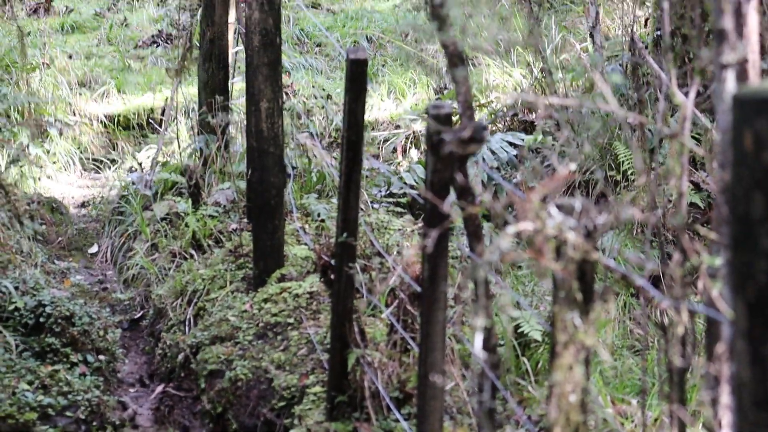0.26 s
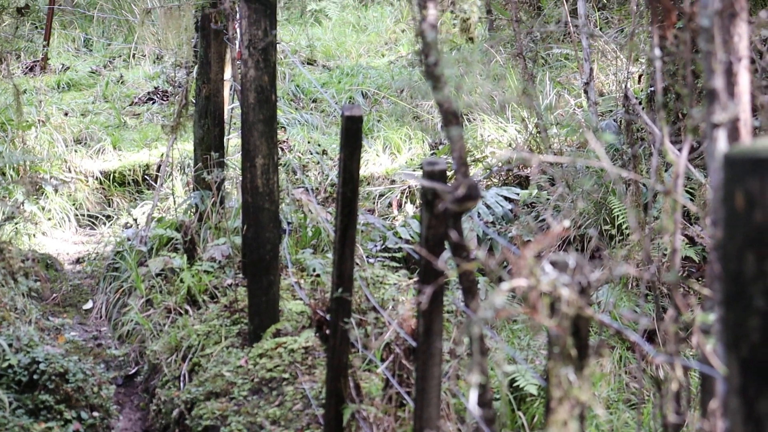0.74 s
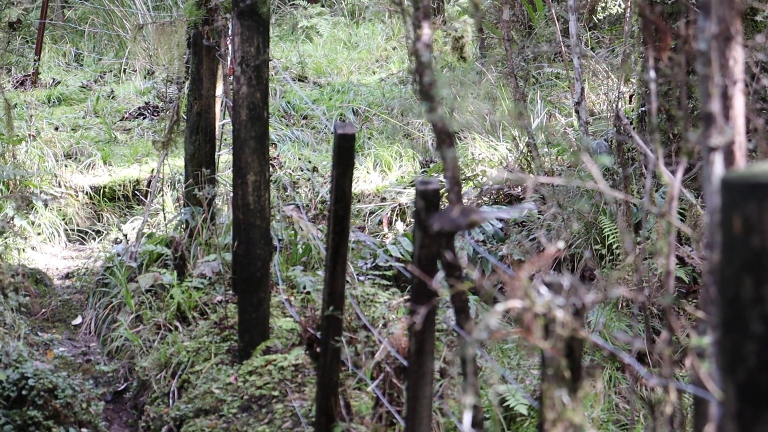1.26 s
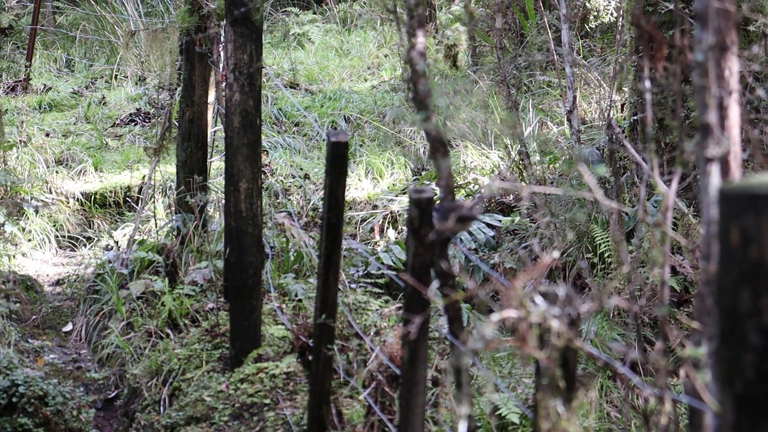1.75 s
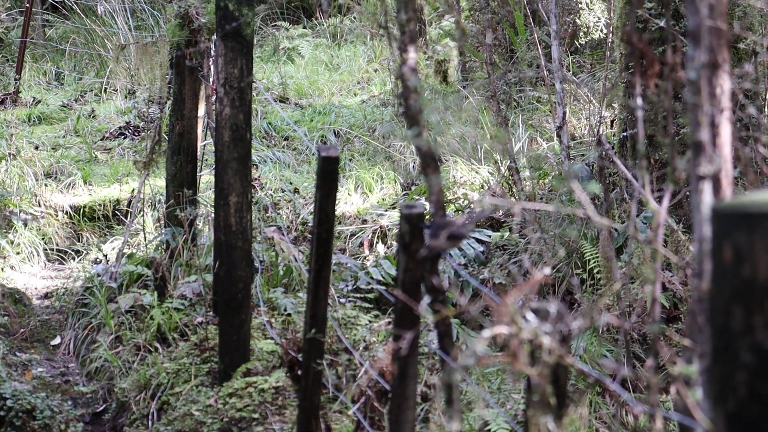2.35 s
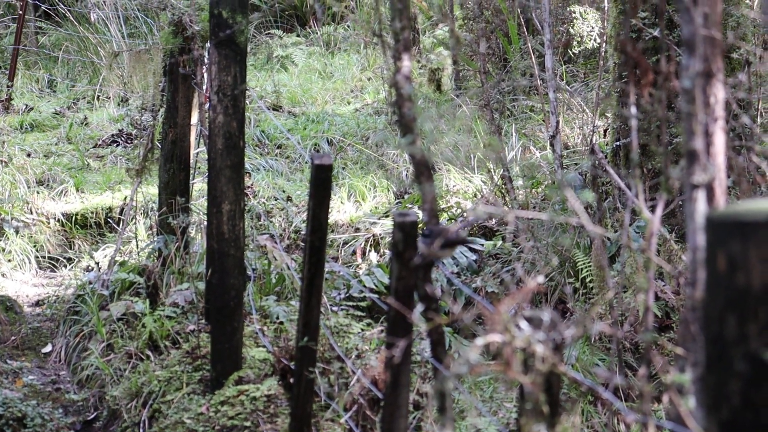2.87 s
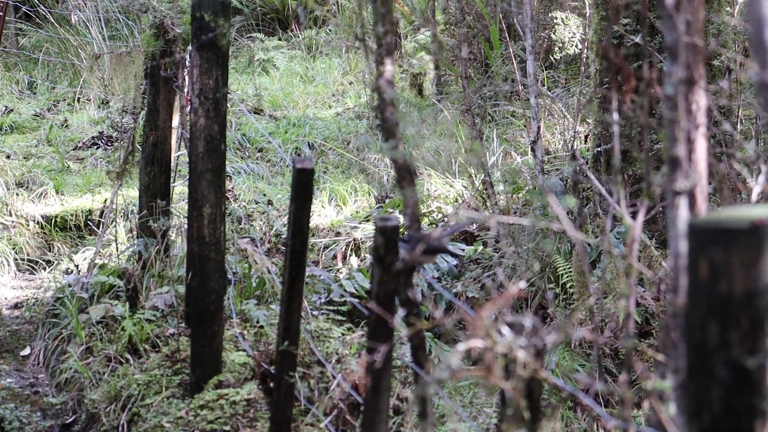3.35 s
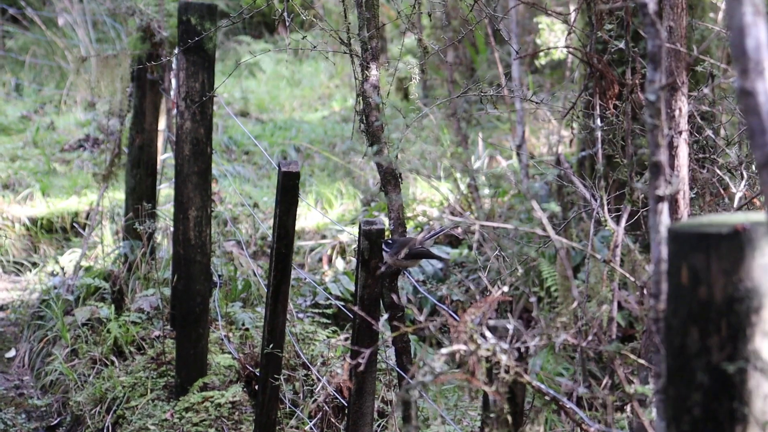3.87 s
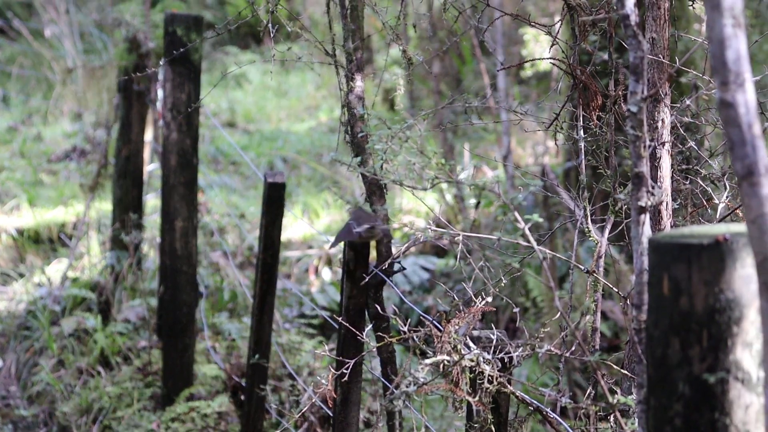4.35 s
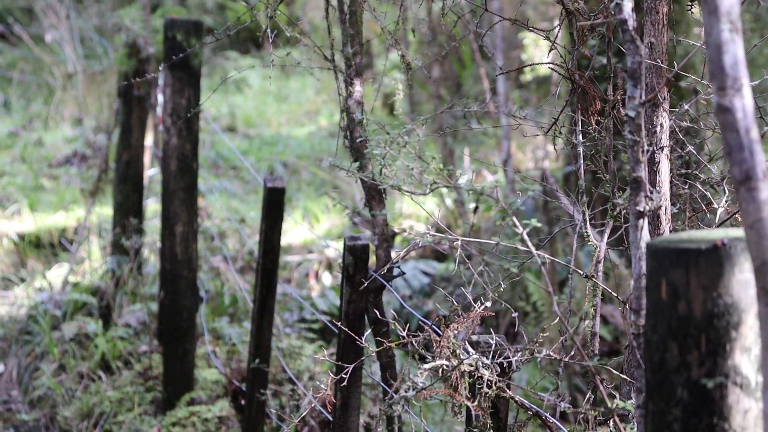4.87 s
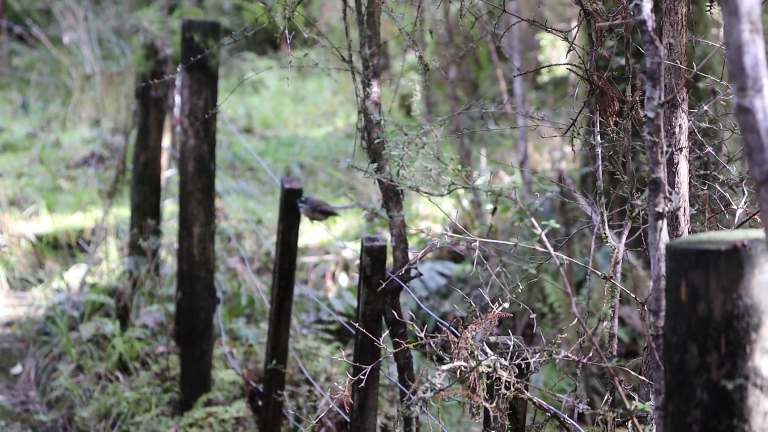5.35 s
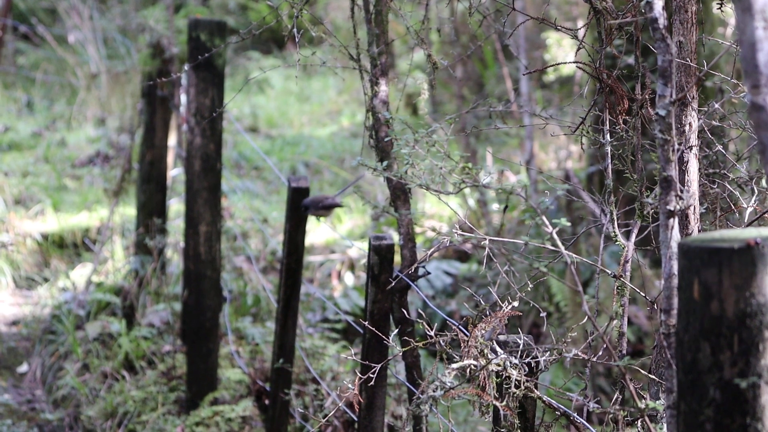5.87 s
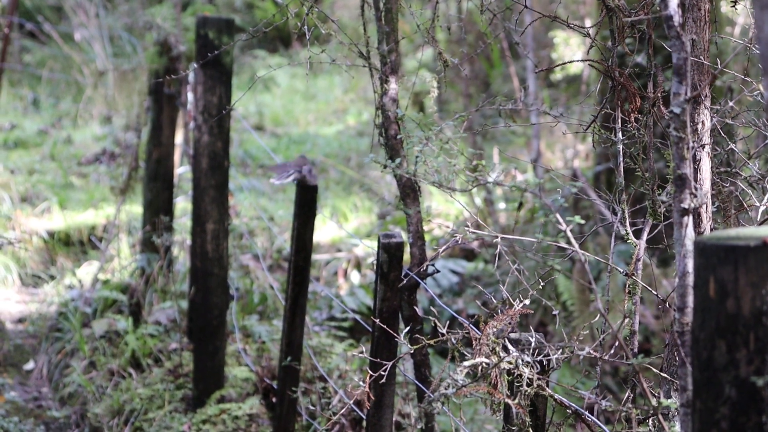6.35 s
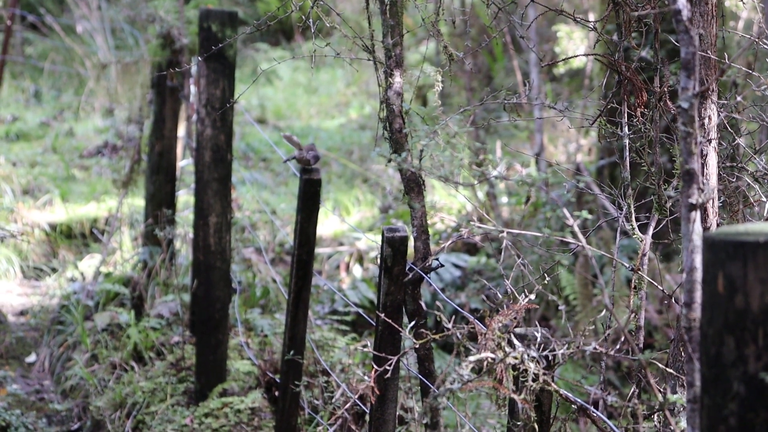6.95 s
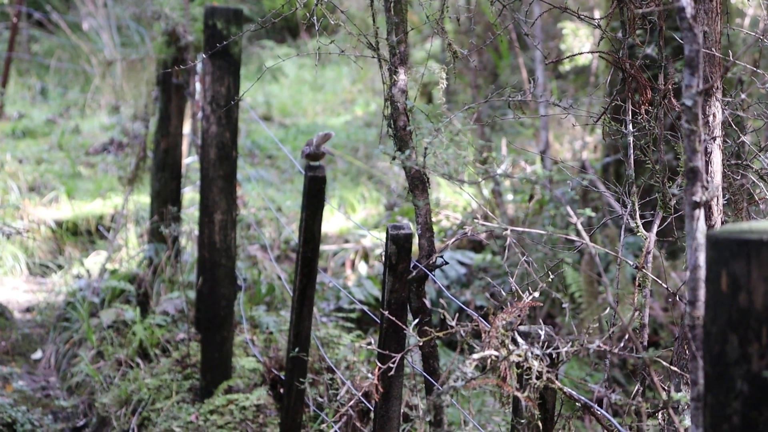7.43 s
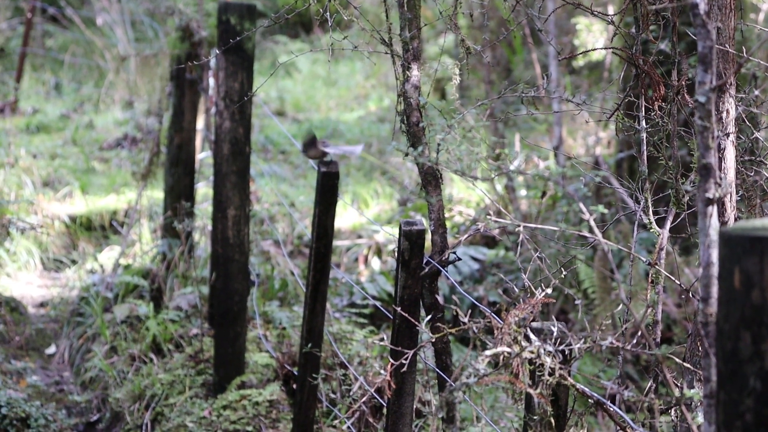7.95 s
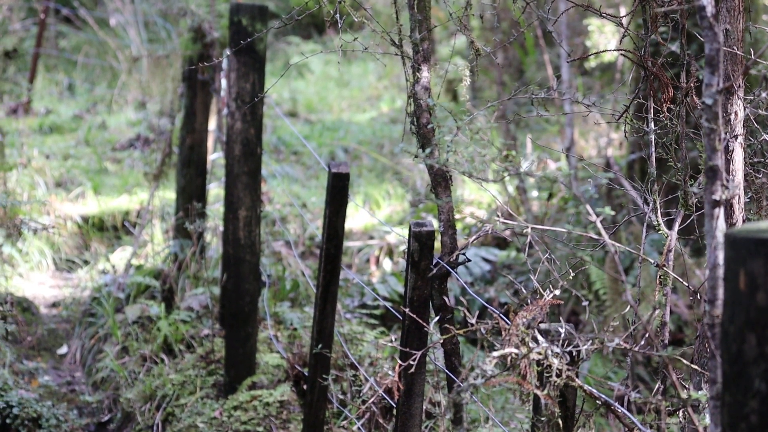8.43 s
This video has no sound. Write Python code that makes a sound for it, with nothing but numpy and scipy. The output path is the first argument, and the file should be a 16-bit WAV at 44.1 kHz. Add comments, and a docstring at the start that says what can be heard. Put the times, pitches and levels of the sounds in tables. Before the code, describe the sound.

Birdsong in a quiet forest: dry clucks, clear ringing notes, sliding whistles, squeals and nasal calls, each with a short echo.

```python
"""A faint, steady rush of forest air and leaves comes first. A bellbird clucks softly, then sings pure
bell notes, sliding whistles, squeals and coughs, with twitter, rasps and bill snaps in between. Its
voice box makes the tones; puffs of air in its throat make the clucks and coughs. The song comes from the
left, and three nasal calls, rich in overtones, come from nearer the middle. Trunks and leaves scatter
every note into a short echo."""
import sys
import numpy as np
from scipy import signal
from scipy.fft import rfft, irfft, next_fast_len
from scipy.io import wavfile
from scipy.ndimage import map_coordinates

SR = 44100
rng = np.random.default_rng(int(sys.argv[2]) if len(sys.argv) > 2 else 0)


def master_out(mix):
    """Clip the mix to full scale and print it as 16-bit PCM to the path in sys.argv[1]."""
    frames = np.transpose(np.atleast_2d(mix))
    ceiling = np.clip(frames, -1, 1)
    pcm = np.round(ceiling * 32767).astype(np.int16)
    wavfile.write(sys.argv[1], SR, pcm)


N = 383669

# The tone of the forest rush. Each row: frequency in Hz, relative level in dB.
FOREST_COLOUR = [(15, -50), (25, -21), (64, -8.5), (110, -7), (333, -3), (413, -10), (460, -8.5),
                 (670, -8.5), (1550, -11.5), (2190, -12), (2380, -12.5), (4190, -14.5), (4800, -16.5),
                 (8220, -20.5), (15700, -25)]
# How alike the rush is left and right. Each row: frequency in Hz, likeness from 0 to 1.
FOREST_LIKENESS = [(40, 0.6), (120, 0.39), (400, 0.6763), (1000, 0.15), (3000, 0.086), (12000, 0.036)]
# The echo from the leaves. Each row: frequency in Hz, seconds it takes to fade by 60 dB.
LEAF_FADE = [(300, 0.8), (1000, 0.60615), (2500, 0.51962), (6000, 0.38924), (14000, 0.23263)]
# Echoes from ground, posts and trunks. Each row: delay in seconds, relative level in dB,
# seconds by which the left side hears it first.
TRUNK_ECHOES = [ (.0043, -11.5, .00012), (.0078, -9.5, .00002), (0.0142, -12, .00015),
                (.0177, -18.5, -.00008), (0.022, -11, .00010), (0.0256, -11, .00014),
                (0.0332, -17, -.00003), (0.0389, -18.5, .00012), (.0462, -20.5, .00005),
                (.0555, -21.5, -.00011), (.0668, -22, .00013)]
# Bouts of twitter. Each row: start in seconds, length in seconds, level in dB.
TWITTER_BOUTS = [(0.046, 0.02228, -54.5), (1.62, 0.055, -66), (2.537, 0.23, -51.5), (4.368, 0.0619, -52),
                 (4.775, 0.06657, -58.5), (5.115, 0.0628, -57), (5.541, 0.11815, -47),
                 (7.811, 0.04354, -51.5), (8.296, 0.0479, -50), (8.42, 0.067, -51.5)]
# Nasal calls. Each row: start in seconds, length in seconds, pitch in Hz, level in dB,
# time of the upward flick in seconds, its height as a share of the pitch.
NASAL_NOTES = [(5.447, 0.12862, 1300, -36, 5.512, .11), (5.745, 0.12995, 1252, -35.5, 5.857, 0.062),
               (6.228, .128, 1242, -37.5, 6.340, 0.016)]
# How the beak shapes a nasal call. Each row: frequency in Hz, relative level in dB.
BEAK_COLOUR = [(1200, -20), (2500, -15.5), (3800, -6), (5100, 3.5), (6300, 3.5), (7600, -6), (9000, -13.5),
               (11500, -16), (15500, -29)]
# Clucks. Each row: start in seconds, relative level in dB.
CLUCK_PUFFS = [(0.908, -38.5), (1.072, -44.5), (1.159, -37.5), (1.179, -42), (1.255, -39), (1.361, -36.5),
               (1.465, -37), (1.559, -38.5), (1.655, -39), (1.789, -47), (1.881, -40.5)]
# How the throat shapes a cluck. Each row: frequency in Hz, relative level in dB.
THROAT_COLOUR = [(150, -21), (550, -14), (800, 0.5), (960, -9), (1200, -11.5), (1650, -12), (2600, -20),
                 (6000, -25.5), (15000, -27.5)]
# Rasps, clicks and bill snaps. Each row: start in seconds, length in seconds,
# ringing frequency in Hz, level in dB.
RASPS_AND_SNAPS = [ (2.541, .086, 11800, -55.5), (2.808, 0.04343, 3930, -46), (3.592, 0.01098, 1260, -50),
                   (3.80, 0.09209, 740.2, -47), (4.068, .019, 1253, -49), (4.103, 0.014106, 1284, -45),
                   (4.140, 0.01921, 1294, -46.5), (4.257, 0.04253, 1165, -53),
                   (5.228, 0.005206, 3200, -50.5), (6.530, 0.005467, 1416, -41),
                   (6.553, 0.008122, 2300, -39), (7.645, 0.007798, 1762, -41.5), (7.657, .045, 1761, -51.5),
                   (7.9612, 0.003, 2101, -37)]
# Coughs. Each row: start in seconds, length in seconds, relative level in dB.
COUGH_NOTES = [(3.776, 0.12382, -44.5), (6.526, .044, -42.5)]
# Where the gullet rings in a cough. Each row: frequency in Hz, width in Hz, gain in dB.
GULLET_RINGS = [(2712.9, 1100, -5.5), (4607.7, 1259, -1), (9510, 15000, -13)]
# Two-voice chirps. Each row: start in seconds, level of the rising voice in dB.
CHIRP_NOTES = [(.725, -50), (5.09, -50.5), (5.585, -52)]
# Squeals. Each row: start in seconds, length in seconds, first pitch in Hz, held pitch in Hz,
# level in dB.
SQUEAL_NOTES = [(4.206, 0.10933, 6320, 5957, -39), (8.113, 0.05451, 7686, 5570, -38)]
# Sliding whistles. Each row: start in seconds, length in seconds, first pitch in Hz, last pitch in Hz,
# level in dB, fade-in in seconds.
SLIDE_NOTES = [ (0.655, 0.016, 2156, 2105, -55.5, 0.029), (1.065, .032, 8991, 7614, -59.5, .006),
               (1.487, 0.024, 2022, 2214, -59, 0.013), (1.953, 0.04148, 2301, 1881, -66.5, 0.01076),
               (2.089, 0.05164, 2391, 1882, -46.5, 0.02288), (2.211, 0.05146, 2606, 1841, -35, 0.02542),
               (2.267, 0.04725, 2550, 1897, -33, 0.01515), (2.474, 0.02424, 1021, 1575, -55, 0.00581),
               (2.637, 0.02986, 2294, 2760, -38, 0.00935), (2.795, 0.04753, 2612, 1545, -22.5, 0.00847),
               (2.841, 0.0545, 1254, 1156, -41.5, 0.004337), (2.959, 0.02971, 2711, 2697, -42.5, 0.012),
               (3.522, .075, 2779, 1598, -57, 0.0057), (3.782, 0.0298, 968.8, 745.6, -46, 0.003482),
               (3.997, 0.16684, 3509, 3860, -50, 0.01694), (4.418, 0.06207, 3452, 1728, -41.5, 0.03055),
               (4.517, 0.03242, 2700, 2031, -46, 0.003333), (4.691, 0.02533, 2222, 1721, -49.5, 0.02865),
               (5.76, 0.05304, 2446, 1896, -40.5, 0.027), (5.828, 0.0338, 2478, 1977, -43, 0.00436),
               (6.001, .036, 2499, 1760, -44, 0.02366), (6.025, 0.02914, 2533, 1770, -40, 0.0056),
               (6.563, 0.06335, 796.5, 672.9, -54, 0.01297), (6.743, 0.037757, 2599, 1690, -32.5, 0.00825),
               (6.957, .12, 4867, 2216, -60, .014), (7.504, .08, 3297, 4354, -54, 0.0097),
               (7.525, 0.10955, 1893, 2740, -59.5, 0.0422), (7.78, 0.02212, 5293, 3553, -51, 0.004434),
               (7.9637, .040, 2062, 1687, -29, 0.001036), (8.044, 0.01976, 2526, 2359, -48, 0.01033),
               (8.162, 0.02242, 3846, 2932, -44.5, 0.002888), (8.299, 0.045418, 2274, 1932, -57.5, 0.01283),
               (8.369, 0.0457, 3265, 2190, -62, 0.00827)]
# Bell notes. Each row: start in seconds, length in seconds, first pitch in Hz, held pitch in Hz,
# level halfway in dB, swell over the note in dB, reediness from 0 to 1.
BELL_NOTES = [ (2.315, 0.06278, 992.7, 1055, -44, 2.5, 0.04), (2.443, 0.03628, 2053, 2176, -37, 9.5, 0),
              (2.457, 0.04538, 1985, 1945, -27.5, 16, 0), (2.531, 0.027334, 1865, 1901, -19.5, -3, 0),
              (2.562, .032, 1933, 1964, -17, -1, 0), (2.592, 0.04, 1935, 1981, -28, 4, 0.01),
              (2.649, .100, 2847, 2884, -27.5, -24, 0), (2.685, 0.04001, 1476, 1353, -33.5, 10.5, 0.01),
              (2.976, .158, 3250, 3003, -17, 2.5, 0), (3.208, 0.15908, 2154, 2079, -22, -3.5, 0),
              (5.883, 0.03499, 987.2, 1025, -43, 8, 0.04), (6.073, 0.13115, 993.8, 1041, -41, -3.5, 0.01),
              (6.348, 0.07885, 2466, 2448, -37, -19, 0), (7.121, 0.10383, 2801, 2670, -41.5, -21, 0),
              (7.278, 0.23678, 1489, 1545, -49.5, -1.5, 0.27), (7.859, 0.06249, 867, 901, -52.5, -3, 0.6),
              (8.546, 0.15244, 851.8, 847.3, -44.5, -5, 0)]
# Overtones of a bell note. Each row: frequency in Hz, level in dB compared with the note.
BELL_OVERTONES = [(2000, -37), (4200, -37.5), (6100, -46.5), (8500, -60), (10500, -42), (12500, -37.5),
                  (15200, -53)]

AIR_HZ, AIR_WIDTH_HZ, AIR_DB = 11700, 15000, -51  # breath hiss, far below its whistle or bell note


def amp(db):
    """Turn decibels into a gain."""
    return 10 ** (np.asarray(db) / 20)


def unit(x):
    """Scale a sound to an average (rms) strength of 1."""
    return x / np.sqrt(np.mean(x ** 2) + 1e-20)


def along(points, hz):
    """Read between the rows of a (frequency, value) table, on a log frequency scale."""
    f, v = np.transpose(points)
    return np.interp(np.log(hz + 1), np.log(f + 1), v)


def filtered(x, response):
    """Give each frequency f in a sound the gain response(f)."""
    n = x.shape[-1]
    padded = next_fast_len(n + 8192)
    return irfft(rfft(x, padded) * response(np.fft.rfftfreq(padded, 1 / SR)), padded)[..., :n]


def wobble(t, rate):
    """A smooth curve through `rate` random values a second."""
    return map_coordinates(rng.standard_normal(size=256), [t * rate], mode="mirror")


def clock(length):
    """The time of each sample in a short sound, in seconds."""
    return np.arange(int(max(length, .004) * SR)) / SR


def gate(t, attack, release):
    """Fade in over `attack` seconds and out over `release` seconds."""
    opening = np.sin(np.pi / 2 * np.clip(t / attack, 0, 1))
    closing = np.sin(np.pi / 2 * np.clip((t[-1] - t) / release, 0, 1))
    return opening * closing


def phase_of(hz):
    """How far a wave of changing pitch has turned, in radians."""
    return 2 * np.pi * np.cumsum(hz) / SR


def add(track, start, sound):
    """Mix a sound into the track at `start` seconds."""
    part = track[int(start * SR):][:len(sound)]
    part += sound[:len(part)]


def burst(t, hz, width_hz, flutter_db=3):
    """A burst of fluttering noise that rings around one frequency."""
    noise = rng.standard_normal(size=16384)[:len(t)] * amp(flutter_db * wobble(t, 300))
    ringing = filtered(noise, lambda f: (1 / (1 + 1j * (f * f - hz * hz) / (f * width_hz + 1))) ** 2)
    return unit(ringing) * gate(t, 0.023 * t[-1], 0.41 * t[-1])


def whistle(t, hz, db, attack, waver=0.0095, second_db=-27, fall_db=-6, full_db=-20):
    """One whistle: the voice box trembles, and louder notes grow stronger overtones."""
    phase = phase_of(hz * (1 + waver * wobble(t, 250)))
    k = np.arange(2, 8)[:, None]  # overtones lie at 2 to 7 times the pitch
    sizes = amp(second_db + fall_db * (k - 2) + db - full_db) * (k * hz < SR / 2)
    overtones = np.sum(sizes * np.sin(k * phase), axis=0)
    breath = amp(AIR_DB) * burst(t, AIR_HZ, AIR_WIDTH_HZ)
    return np.sqrt(2) * amp(db) * gate(t, attack, 0.0034) * (np.sin(phase) + overtones + breath)


def forest(level_db=-57.0, sway_db=1.0961, left_db=0.3069):
    """Distant air and leaves rush faintly: the lows are alike on both sides, the highs spread wide."""
    def colour(f):
        spread = np.arccos(np.clip(along(FOREST_LIKENESS, f), -1, 1)) / 2
        return amp(along(FOREST_COLOUR, f)) * [np.cos(spread), np.sin(spread)]
    mid, side = filtered(rng.standard_normal((2, N)), colour)
    sway = sway_db * wobble(np.arange(N) / SR, 5.3)
    return amp(level_db + sway) * unit(np.array([(mid + side) * amp(left_db), mid - side]))


def bush(x, lead_s, left_db, trunks_db, leaves_db, build_s=0.0067, bark_hz=9000):
    """A sound arrives first and louder on the left; trunks and leaves answer from all sides."""
    t = clock(.9)
    hz, times, noise = signal.stft(rng.standard_normal((2, len(t))), SR, nperseg=256)
    fade = amp(-60 * times / along(LEAF_FADE, hz)[:, None])
    leaves = signal.istft(noise * fade, SR, nperseg=256)[1][:, :len(t)]
    leaves = unit(leaves * (1 - np.exp(-t / build_s))) / np.sqrt(len(t))
    sides = np.array([[1], [-1]])  # left, right
    f = np.fft.rfftfreq(len(t), 1 / SR)
    # each trunk returns one copy, dulled a little by its bark
    copies = sum(amp(db) * np.exp(-2j * np.pi * f * (delay - sides * early / 2))
                 for delay, db, early in TRUNK_ECHOES)
    trunks = irfft(copies / (1 + 1j * f / bark_hz), len(t))
    echo = signal.fftconvolve(x[None], amp(trunks_db) * trunks + amp(leaves_db) * leaves, axes=1)
    direct = filtered(x, lambda f: np.exp(1j * np.pi * f * lead_s * sides)) * amp(sides * left_db / 2)
    return direct + echo[:, :N]


def twitter(centre_hz=4100, wander=0.082, scratch=0.012):
    """A thin, scratchy whistle wanders up and down at random."""
    out = np.zeros(N)
    for start, length, db in TWITTER_BOUTS:
        t = clock(length)
        hz = centre_hz * np.exp(wander * wobble(t, 60) + scratch * wobble(t, 900))
        add(out, start, whistle(t, hz, db, attack=.012))
    return out


def nasal_calls(slack=0.38, slack_db=-15, sag=.014, flick_s=0.01, waver=0.0076,
                flicker_db=4.0, hiss_db=-24, hoarse_db=-5):
    """The beak shapes a stack of overtones. Pitch and level follow the effort; the start is hoarse."""
    out = np.zeros(N)
    for start, length, hz, db, flick_at, flick_height in NASAL_NOTES:
        t = clock(length)
        relaxed = np.exp(-(t / .014) ** 2) + np.exp((t - t[-1]) / 0.0063)  # little effort at both ends
        hoarse = np.exp(-(t / 0.023) ** 2)
        flick = flick_height * np.exp(-((start + t - flick_at) / flick_s) ** 2)
        pitch = hz * (1 - slack * relaxed + sag * np.cos(2 * np.pi * t / length) + flick)
        jitter = 0.0035 + 0.069 * hoarse
        pitch *= 1 + waver * wobble(t, 260) + jitter * wobble(t, 1500)
        phase = phase_of(pitch)
        voice = sum(amp(along(BEAK_COLOUR, k * pitch) + flicker_db * wobble(t, 115.53))
                    * np.sin(k * phase) for k in range(1, 13))
        hiss = unit(filtered(rng.standard_normal(len(t)), lambda f: amp(along(BEAK_COLOUR, f) / 2)))
        swell = amp(db + slack_db * relaxed) * gate(t, 0.0054, 0.0019)
        add(out, start, swell * (unit(voice) + (amp(hiss_db) + amp(hoarse_db) * hoarse) * hiss))
    return out


def clucks(fade_s=0.07109, gain_db=-5):
    """Soft, dry clucks: short puffs that die away in the hollow of the throat."""
    out, t = np.zeros(N), clock(0.13)
    for start, db in CLUCK_PUFFS:
        air = rng.standard_normal(size=8192)[:len(t)]
        puff = unit(filtered(air, lambda f: amp(along(THROAT_COLOUR, f))))
        add(out, start, amp(db + gain_db - 60 * t / fade_s) * gate(t, 0.0018, .01) * puff)
    return out


def rasps_and_snaps(sharpness=2.8):
    """Short rasps, sharp clicks and bill snaps, each ringing around one frequency."""
    out = np.zeros(N)
    for start, length, hz, db in RASPS_AND_SNAPS:
        add(out, start, amp(db) * burst(clock(length), hz, hz / sharpness))
    return out


def coughs():
    """Harsh puffs make the gullet ring at all its frequencies together."""
    out = np.zeros(N)
    for start, length, db in COUGH_NOTES:
        for hz, width_hz, gain_db in GULLET_RINGS:
            add(out, start, amp(db + gain_db) * burst(clock(length), hz, width_hz))
    return out


def chirps(low_hz=1300, high_hz=1630, held_hz=1745, held_db=1.5, attack=0.01459, full_db=-38):
    """Both sides of the voice box sound at once: one holds its note, the other rises towards it."""
    out, t = np.zeros(N), clock(.043)
    for start, db in CHIRP_NOTES:
        add(out, start, whistle(t, np.linspace(low_hz, high_hz, len(t)), db, attack, full_db=full_db))
        add(out, start, whistle(t, held_hz, db + held_db, attack, full_db=full_db))
    return out


def squeals(settle_s=0.0099, jerk=.028, hiss_hz=6900, width_hz=1300, hiss_db=-8, octave_db=-15):
    """High, strained whistles: the pitch drops onto its note, jerks about and breaks into hiss."""
    out = np.zeros(N)
    for start, length, first_hz, held_hz, db in SQUEAL_NOTES:
        t = clock(length)
        hz = held_hz + (first_hz - held_hz) * np.exp(-t / settle_s)
        hz *= 1 + jerk * wobble(t, 700) ** 2
        hiss = amp(hiss_db) * burst(t, hiss_hz, width_hz)
        hiss += amp(octave_db) * burst(t, 2 * held_hz, 2 * width_hz)
        add(out, start, whistle(t, hz, db, attack=0.0212) + amp(db) * gate(t, length, 0.0039) * hiss)
    return out


def sliding_whistles(ease=.4, hum_db=-61, hum_below_hz=2700):
    """Quick whistles, mostly falling, that slide fastest at first and then ease off."""
    out = np.zeros(N)
    for start, length, first_hz, last_hz, db, attack in SLIDE_NOTES:
        t = clock(length)
        progress = t / t[-1]
        hz = first_hz + (last_hz - first_hz) * (progress + ease * progress * (1 - progress))
        # the other side of the voice box hums an octave under the lower whistles
        hum = whistle(t, hz / 2, hum_db, attack) * (first_hz < hum_below_hz)
        add(out, start, whistle(t, hz, db, attack) + hum)
    return out


def bells(settle_s=0.03, waver=0.006136, flutter_db=2, attack=0.031, shimmer_db=3):
    """Nearly pure tones slide onto their pitch and hold it while the air pressure flutters."""
    out = np.zeros(N)
    for start, length, first_hz, held_hz, level_db, swell_db, reediness in BELL_NOTES:
        t = clock(length)
        hz = held_hz + (first_hz - held_hz) * np.exp(-t / settle_s)
        phase = phase_of(hz * (1 + waver * wobble(t, 67.706)))
        tone = np.sin(phase) + reediness * (np.sin(3 * phase) + np.sin(5 * phase) / 4)
        tone += amp(AIR_DB) * burst(t, AIR_HZ, AIR_WIDTH_HZ)
        for k in range(2, 8):
            overtone_db = along(BELL_OVERTONES, k * held_hz) + shimmer_db * wobble(t, 60)
            tone += amp(overtone_db) * np.sin(k * phase)
        db = level_db + swell_db * (t / length - .5) + flutter_db * wobble(t, 62.336)
        add(out, start, np.sqrt(2) * amp(db) * gate(t, min(attack, 0.3 * length), 0.0089) * tone)
    return out


def scene():
    """The song from the left, the nasal calls nearer the middle, the forest all round."""
    bird = bells() + sliding_whistles() + chirps() + twitter() + squeals()
    bird += coughs() + rasps_and_snaps() + clucks()
    song = bush(bird, lead_s=0.00012175, left_db=3.0, trunks_db=0.0425, leaves_db=-11)
    calls = bush(nasal_calls(), lead_s=.00002, left_db=2.0, trunks_db=-2, leaves_db=-12)
    return song + calls + forest()


def record(dry):
    """Cut away the very highest treble, from 15800 Hz up."""
    return filtered(dry, lambda hz: hz < 15800)


dry = scene()
out = record(dry)
master_out(out)
```